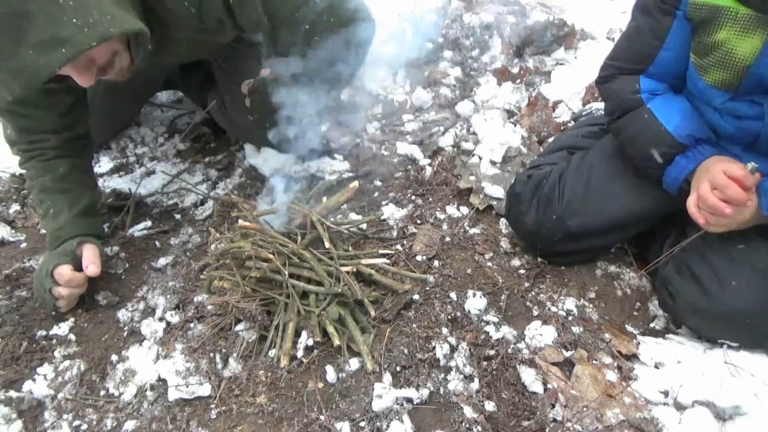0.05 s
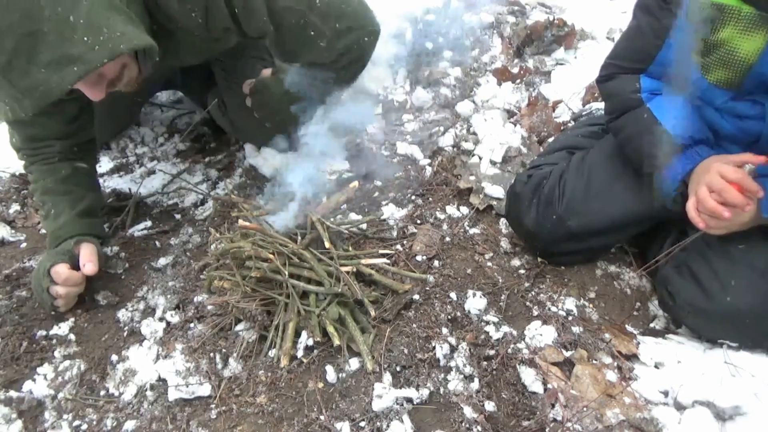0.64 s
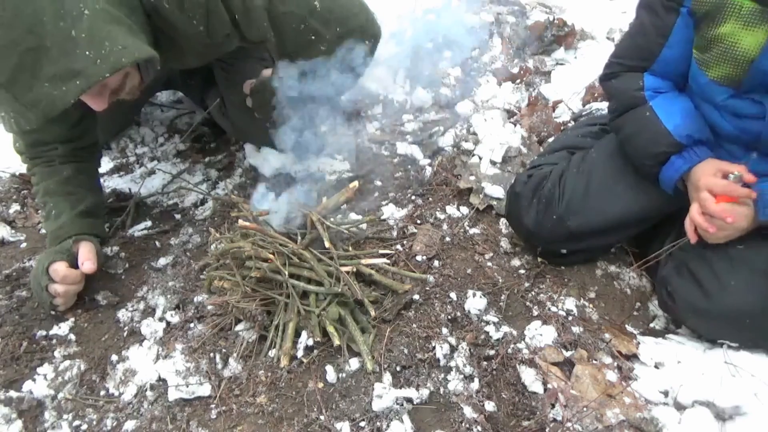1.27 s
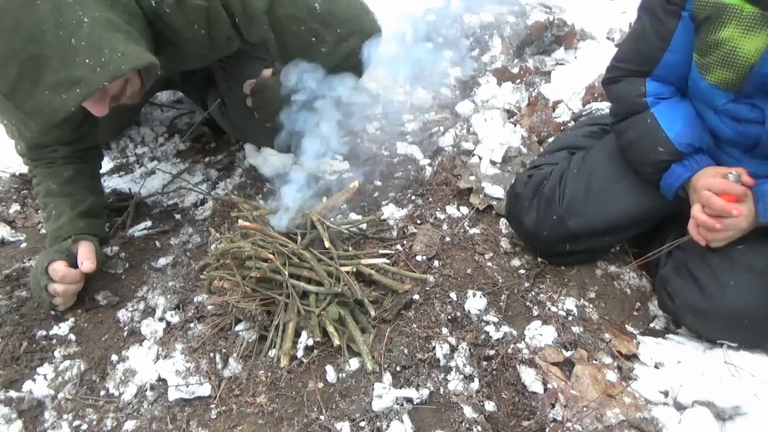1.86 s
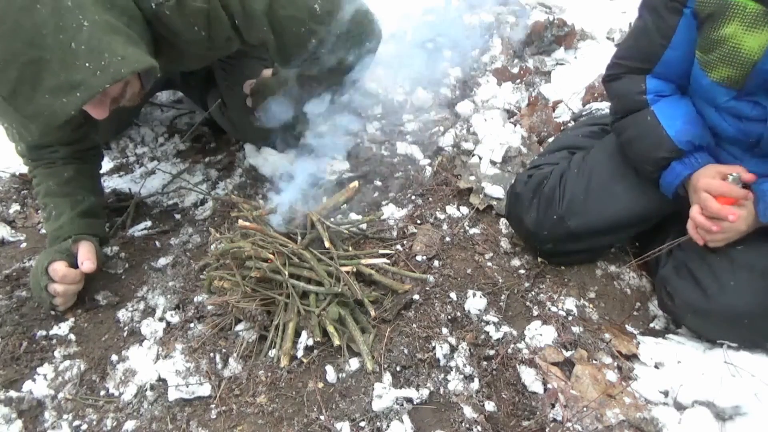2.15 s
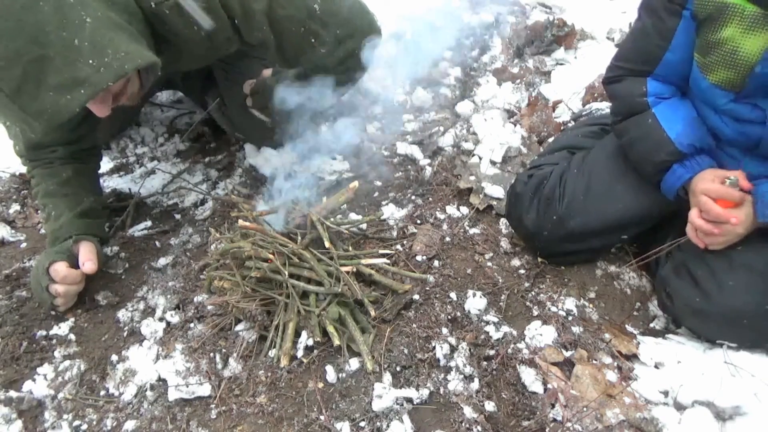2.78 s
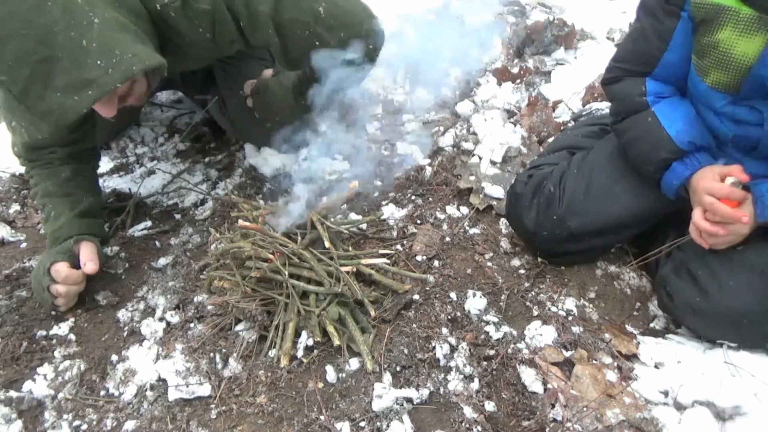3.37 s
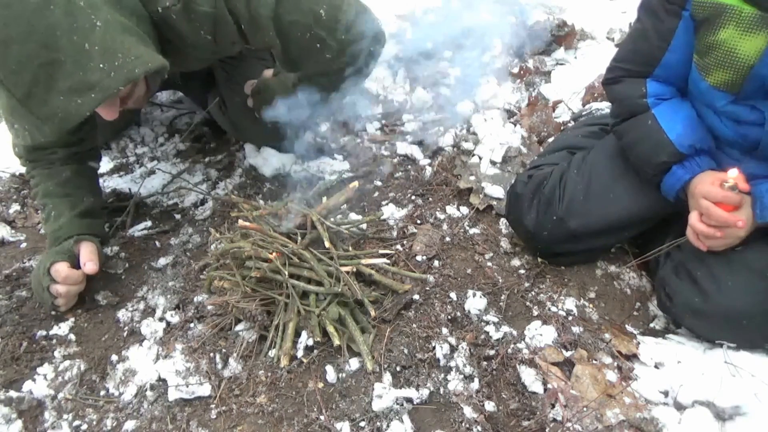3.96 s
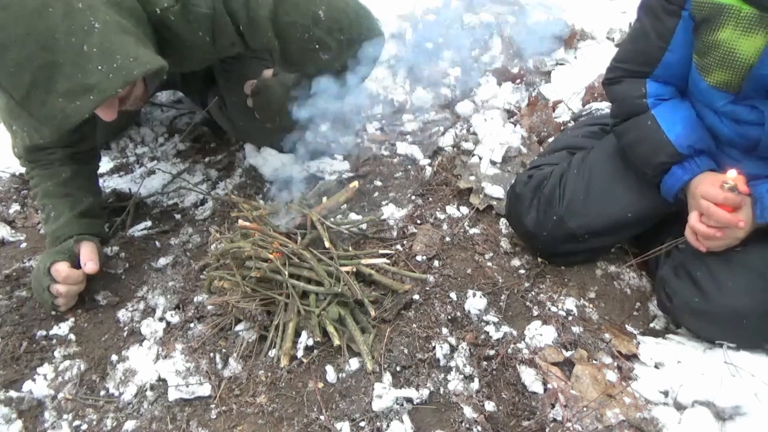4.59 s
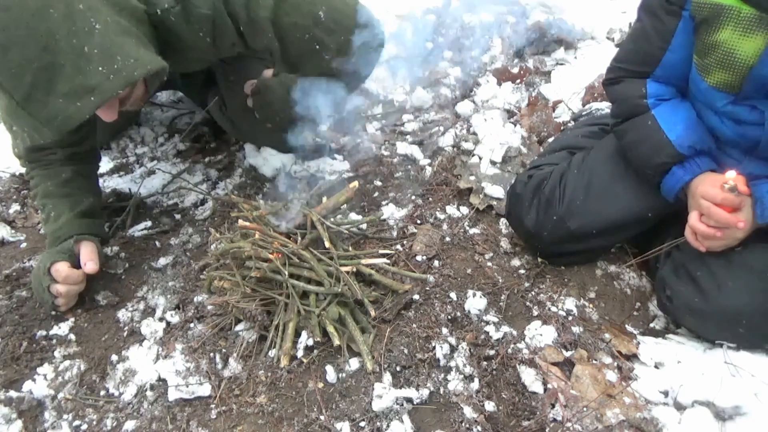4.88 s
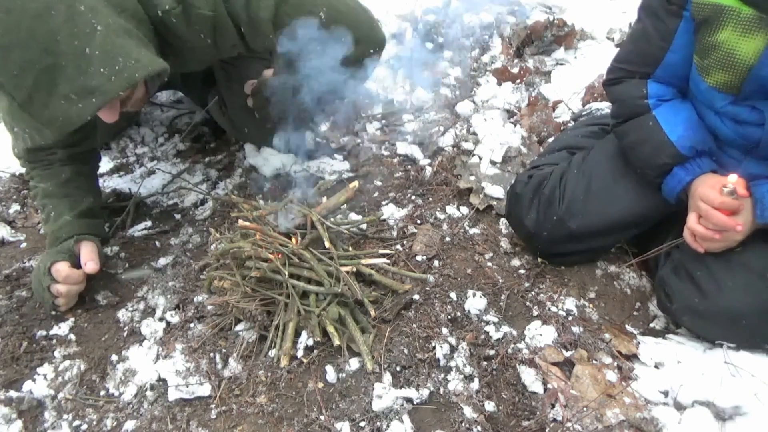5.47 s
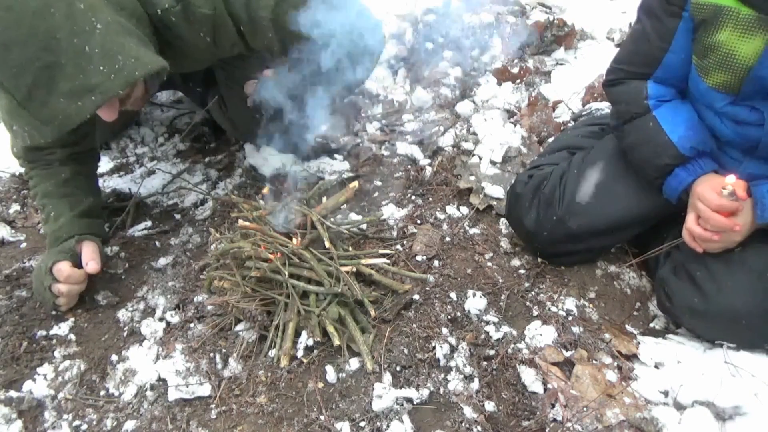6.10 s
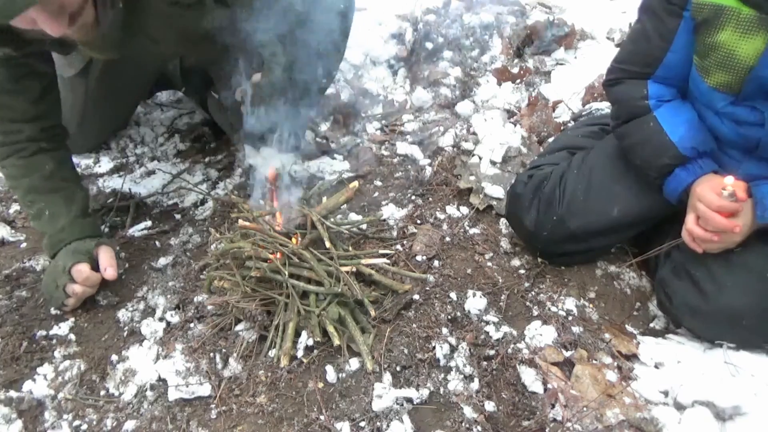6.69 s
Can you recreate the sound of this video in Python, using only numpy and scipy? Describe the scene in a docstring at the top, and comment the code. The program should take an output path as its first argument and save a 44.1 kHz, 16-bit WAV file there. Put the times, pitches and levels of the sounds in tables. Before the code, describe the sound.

A small heap of damp twigs and needles smoulders outdoors, close to the microphone and near the centre. A faint, fine, bright crackle runs throughout, dotted with small ticks and dry pops of sap. Loud, sharp snaps stand out at about 2.0, 2.9, 4.2 and 5.3 seconds, the first and last being the strongest, with milder ones near 4.6 and 5.1 seconds. The crackle thickens around 5.7 seconds, then eases.

Slightly to the right, a thumb turns a lighter's wheel four times, at about 1.2, 1.8, 2.6 and 3.5 seconds. Each is a brief, gritty, slightly metallic scrape, much quieter than the big snaps. A few small dull handling ticks fall mostly in the first second and a half. A lens motor ticks barely audibly at the start and in the last second. Very faint distant traffic and a soft hiss continue underneath until the end, near 6.7 seconds.

```python
"""In snowy woods, a heap of damp twigs and needles smoulders close to a camera. Pockets of sap burst
with sharp pops over a fine crackle. To the right, a thumb turns a lighter's wheel four times, scraping
the flint. The camera's lens motor ticks faintly near the start and the end. Behind it all,
far traffic murmurs and the microphone hisses."""
import sys
import numpy as np
from scipy import signal
from scipy.fft import rfft, irfft, next_fast_len
from scipy.io import wavfile
from scipy.ndimage import uniform_filter1d, map_coordinates

SR = 44100
rng = np.random.default_rng(int(sys.argv[2]) if len(sys.argv) > 2 else 0)


def inscribe(sig):
    """Save sig as 16-bit PCM at rate SR to the path in sys.argv[1].

    A 1-D sig is mono; a 2-D sig holds one channel per row.
    Samples are clipped to [-1, 1] before scaling.
    """
    pcm = np.round(np.clip(np.atleast_2d(sig).T, -1, 1) * 32767)
    wavfile.write(sys.argv[1], SR, pcm.astype(np.int16))


N = 297234

# Levels in the tables are relative: the functions add their own gain.
# the loudest bursts of sap: t/s, level/dB, body/dB (extra strength below the treble)
SAP_POPS = [(0.0862, -33.5, -1), (0.389, -27, -8), (0.9768, -37.5, 18), (1.9621, -5.5, 9.5),
            (2.1095, -39.5, -3), (2.224, -35.5, -8), (2.927, -14.5, 5.5), (3.441, -30, 12),
            (3.5908, -36, -8), (4.146, -36, -7), (4.246, -11, 2.5), (4.2846, -37, -4), (4.4155, -38.5, -11),
            (4.5859, -23.5, 2.5), (4.6174, -33.5, -10), (4.6894, -33.5, 7), (4.9228, -37.5, -10),
            (5.0994, -22, 0.5), (5.2608, -33.5, -10), (5.322, -5, -2), (5.4926, -34, -7), (5.6286, -32, -8),
            (5.633, -27.5, -6), (5.8006, -35.5, -8), (5.9143, -33.5, -6), (6.0928, -33, -3),
            (6.1786, -32, -8), (6.2087, -35.5, -4), (6.6794, -31.5, -5)]
# the tone of a pop: f/Hz, level/dB
POP_TONE = [(80, -18), (450, -23), (900, -40), (1600, -16.5), (2600, -24.5), (4200, -5), (5700, -11.5),
            (7300, -3), (8300, 0.5), (9800, 3.5), (11000, -2), (13000, -10)]
# where a pop gets its body: f/Hz, share of body
BODY_SHARE = [(700, 0.62), (2000, 1), (5500, 0.25), (8000, 0)]
# sticks jolted by strong pops: t/s, level/dB, f/Hz
STICK_KNOCKS = [(2.928, -44.5, 950), (4.2478, -41.5, 600), (5.1012, -46.5, 850), (5.3235, -44, 620)]
# how lively the embers are: t/s, crackles per second
CRACKLE_RATE = [(0, 31), (1.5, 16.6), (5.2, 32), (5.7, 120), (6.74, 29)]
# what makes a crackle brighter than a pop: f/Hz, level/dB
CRACKLE_TILT = [(5000, -2), (8500, -0.5)]
# thumb strokes on the lighter's wheel: t/s, level/dB, hold/s, brightness/dB
THUMB_STROKES = [(1.174, -36.5, .001, -3), (1.847, -35, .021, 3.5), (2.643, -27.5, 0.0039, 11.5),
                 (3.479, -29, 0.0057, -4)]
# the wheel catches on the flint as a stroke ends: t/s, level/dB
FLINT_CATCHES = [(1.189, -39), (1.8737, -25), (1.882, -32), (1.891, -33), (3.4936, -33), (3.4975, -31.5)]
# the tone of the scraped flint: f/Hz, level/dB
RASP_TONE = [(150, -17), (1200, -18), (2000, -8.5), (2750, -1.5), (3500, -1), (4800, -0.5), (6000, -9),
             (7500, 1.5), (8600, 1), (10000, -5.5), (11200, -8), (12500, -70)]
# where a scrape gets its brightness: f/Hz, share of brightness
BRIGHT_SHARE = [(4000, 0.17), (8000, 0.73)]
# the ringing notes of the steel hood and wheel: f/Hz, width/Hz, level/dB
HOOD_NOTES = [(2790, 33, -18), (2840, 230, -0.5), (3760, 32, -3.5), (5000, 69, 4.5), (5120, 51, -6),
              (5570, 45, 2), (7370, 36, -3), (7850, 88, -2)]
# the hand bumps the lighter: t/s, level/dB
HAND_BUMPS = [(2.14, -59), (2.254, -60), (2.642, -55), (3.216, -53)]
# small dull ticks: t/s, level/dB
DULL_TICKS = [(0.349, -40), (0.8459, -44), (0.875, -36.5), (1.3848, -39), (5.5462, -39)]
# the tone of a tick: f/Hz, level/dB
TICK_TONE = [(800, -18), (2000, -7), (2900, -0.5), (5500, -11), (11000, -15.0)]
# when the lens motor runs: start/s, end/s, level/dB
LENS_RUNS = [(0.018, .80, -59.5), (5.5567, 6.74, -60)]
# the tone of far tyres: f/Hz, level/dB
TYRE_TONE = [(150, -16), (330, -11), (480, -4), (640, -4.5), (820, 0), (1130, -3), (1400, -6),
             (1900, -10.5), (2600, -20.5), (5000, -53)]
# far engines: f/Hz, starting level/dB, change/(dB per s)
FAR_ENGINES = [(84, -77.5, 0.73), (152.7, -75.5, -0.38)]
# the tone of the low rumble: f/Hz, level/dB
RUMBLE_TONE = [(15, -30), (30, 3), (48, -0.5), (65, -3), (110, -4), (200, -6), (350, -10), (800, -26)]
# the tone of the microphone's hiss: f/Hz, level/dB
HISS_TONE = [(1200, -28), (2000, -9.5), (2900, -1.5), (4000, -5), (5300, -7.5), (7500, -5.5), (9200, -3.5),
             (10200, -7.5), (11000, -8.5), (11300, -46), (12500, -70)]
# how the hiss rises and falls: t/s, level/dB
HISS_DRIFT = [(0, -67), (1.0, -64), (2.2, -66), (4.2, -68), (5.5, -68), (6.74, -66)]
# how alike the background is left and right: f/Hz, likeness (1 or more is nearly the same)
STEREO_LIKENESS = [(60, 1.2), (120, 1), (220, 0.8), (430, 0.8), (840, 0.81), (1620, 0.43), (3130, 0.42),
                   (6050, 0.67), (11700, 0.88)]
# how the background leans to one side: f/Hz, left minus right/dB
STEREO_LEAN = [(60, 0.5), (130, 0.0), (270, 0), (570, 1), (1220, 4), (2590, 1), (5500, -0.5), (11700, 1)]
# the camera's steep loss of treble: f/Hz, level/dB
TREBLE_EDGE = [(10950, 0), (11300, -14), (12300, -31), (14000, -44)]

HEAP_PAN_DB, LIGHTER_PAN_DB = 1.4, -4.5  # above zero is left, below zero is right


def sap_pops(gain_db=6.5, heap_db=-16, ground_db=-24, twig_db=-26, delay_s=0.00067):
    """A pocket of sap bursts and rings its twig; the heap and the ground scatter the crack."""
    out = np.zeros((2, N))
    for s, db, body_db in SAP_POPS:
        crack = impulse(lambda hz: along(POP_TONE, hz) + body_db * along(BODY_SHARE, hz))
        burst = ragged_burst()
        sides = []
        for _ in range(2):  # left and right get their own echoes
            heap = amp(heap_db) * delayed(echoes(t60=0.05))
            ground = amp(ground_db) * delayed(echoes(t60=0.057))
            sides.append(burst + heap + ground)
        pop = signal.fftconvolve(sides, crack[None], axes=1)
        add(out, s + delay_s, amp(db + gain_db) * pop / np.linalg.norm(pop[0]))
        add(out, s + delay_s, amp(db + twig_db + body_db) * delayed(twig_ring()))
    return panned(out, HEAP_PAN_DB)


def ragged_burst(t60=0.0035, ripple=0.83):
    """The short, rough puff of a pop; less ripple makes its frequencies more even."""
    spectrum = rfft(echoes(t60))
    burst = irfft(spectrum / (np.abs(spectrum) + 1e-9) ** (1 - ripple))
    return np.roll(burst, SR // 1000) / np.linalg.norm(burst)


def twig_ring(pitch_hz=4100, spread=.25, t60=.015, count=6):
    """A twig rings briefly with a few notes of random pitch."""
    t = np.arange(2048) / SR
    hz = pitch_hz * np.exp(spread * np.clip(rng.standard_normal((count, 1)), -2, 2))
    return np.sin(2 * np.pi * hz * t).mean(axis=0) * amp(-60 * t / t60)


def stick_knocks(t60=0.014):
    """A stick jolted by a pop gives a short, hollow knock."""
    out, t = np.zeros((2, N)), np.arange(SR // 20) / SR
    for s, db, hz in STICK_KNOCKS:
        add(out, s, amp(db - 60 * t / t60) * np.sin(2 * np.pi * hz * t))
    return panned(out, HEAP_PAN_DB)


def needle_crackle(level_db=-52, spread_db=3.2, max_boost_db=8):
    """Many small, bright bursts in the needles, at random moments and of random size."""
    bursts = rng.random(N) < over_time(CRACKLE_RATE) / SR
    sizes = amp(np.minimum(spread_db * rng.exponential(size=N), max_boost_db))
    crack = impulse(lambda hz: along(POP_TONE, hz) + along(CRACKLE_TILT, hz))
    return amp(level_db) * signal.fftconvolve(bursts * sizes, crack / np.abs(crack).max())[:N]


def lighter(ground_db=-15):
    """The wheel scrapes the flint and rings the steel hood; the ground adds a short echo."""
    out = np.zeros((2, N))
    for s, db, hold_s, bright_db in THUMB_STROKES:  # a slower stroke also swells more slowly
        add_scrape(out, s, db, bright_db, rise_s=0.0031 + 0.27 * hold_s, hold_s=hold_s)
    for s, db, _, _ in THUMB_STROKES:  # the thumb rubs the wheel before it bites
        add_scrape(out, s, db - 17.5, bright_db=-8, rise_s=0.016)
    for s, db in FLINT_CATCHES:  # a catch is short and a little dull
        add_scrape(out, s, db, bright_db=-3, rise_s=0.0004, fall_s=0.0017)
    out = filtered(out, steel_hood)
    ground = np.array([echoes(t60=0.097) for _ in range(2)])
    return out + amp(ground_db) * signal.fftconvolve(out, ground, axes=1)[:, :N]


def add_scrape(out, s, db, bright_db, rise_s, hold_s=0, fall_s=0.0041, gain_db=-2.5, grit_db=2):
    """Mix in one scrape of the wheel: noise, made gritty by its teeth, that swells and dies."""
    t = np.arange(-SR // 12, SR // 12) / SR
    pressure = np.exp(np.minimum(np.minimum(t / rise_s, (hold_s - t) / fall_s), 0))
    teeth = amp(grit_db * unit(uniform_filter1d(rng.standard_normal(len(t)), size=40)))
    tone = lambda hz: amp(along(RASP_TONE, hz) + bright_db * along(BRIGHT_SHARE, hz))
    rasp = unit(filtered(teeth * rng.standard_normal(len(t)), tone))
    add(out, s + t[0], amp(db + gain_db) * panned(pressure * rasp, LIGHTER_PAN_DB))


def steel_hood(hz):
    """The hood lets the scrape through and boosts it near its own ringing notes."""
    return 1 + sum(amp(db) * 1j * hz * width / (note ** 2 - hz ** 2 + 1j * hz * width)
                   for note, width, db in HOOD_NOTES)


def hand_bumps(pitch_hz=255, swell_s=.005, gain_db=-3):
    """Soft, low bumps as the hand shifts its grip."""
    out, t = np.zeros((2, N)), np.arange(SR // 10) / SR
    bump = np.sin(2 * np.pi * pitch_hz * t) * t / swell_s * np.exp(1 - t / swell_s)
    for s, db in HAND_BUMPS:
        add(out, s, amp(db + gain_db) * bump)
    return out


def dull_ticks(gain_db=-4, delay_s=0.00087):
    """Small dull ticks, like plastic shifting in a hand."""
    out = np.zeros((2, N))
    shell = impulse(lambda hz: along(TICK_TONE, hz))
    for s, db in DULL_TICKS:
        tick = signal.fftconvolve(echoes(t60=0.017), shell)
        add(out, s + delay_s, amp(db + gain_db) * tick / np.abs(tick).max())
    return out


def lens_motor(whine_hz=3220, octave_db=-6, step_s=0.0026, steps_per_s=29.97, gain_db=-1):
    """The motor moves in short whining steps, each with a slightly different level and pitch."""
    out, t = np.zeros((2, N)), np.arange(-SR // 100, SR // 100) / SR
    swell = np.exp(-(t / step_s) ** 2)
    for start, end, db in LENS_RUNS:
        for s in np.arange(start, end, 1 / steps_per_s):
            size, detune = rng.standard_normal(2)
            phase = 2 * np.pi * whine_hz * (1 + 0.011 * detune) * t
            whine = np.sin(phase) + amp(octave_db) * np.sin(2 * phase)
            add(out, s + t[0], amp(db + gain_db + 1.6 * size) * whine * swell)
    return out


def far_traffic(tyre_db=-57.5, fade_db_per_s=0.1, drift_db=0.8, swell_db=2, rumble_db=-64):
    """Tyres slowly move away while engines swell and waver over a low rumble."""
    t = np.arange(N) / SR
    tyres = amp(tyre_db - fade_db_per_s * t + drift_db * wobble(6)) * wide_noise(TYRE_TONE)
    engines = np.zeros(N)
    for hz, db, db_per_s in FAR_ENGINES:
        loudness = amp(db + db_per_s * t + swell_db * wobble(3.17))
        engines += loudness * unit(np.sin(2 * np.pi * hz * t + wobble(4)))
    return tyres + engines + amp(rumble_db) * wide_noise(RUMBLE_TONE)


def microphone_hiss(gain_db=1):
    """The microphone's own faint hiss drifts slowly in level."""
    return amp(over_time(HISS_DRIFT) + gain_db) * wide_noise(HISS_TONE)


def wide_noise(tone):
    """Noise from all around: a middle part both sides share, and a side part that sets them apart."""
    def middle_and_side(hz):
        angle = np.arccos(np.clip(along(STEREO_LIKENESS, hz), 0, .99)) / 2
        return amp(along(tone, hz)) * [np.cos(angle), np.sin(angle)]
    middle, side = filtered(rng.standard_normal((2, N)), middle_and_side)
    lean = lambda hz: amp(along(STEREO_LEAN, hz) * np.array([[.5], [-.5]]))
    return unit(filtered(np.array([middle + side, middle - side]), lean))


def echoes(t60, size=2048):
    """A cloud of tiny echoes that fades at a pace of 60 dB in t60 seconds."""
    cloud = rng.standard_normal(size) * amp(-60 * np.arange(size) / SR / t60)
    return cloud / np.linalg.norm(cloud)


def impulse(tone_db, size=2048):
    """A click with the given tone, its energy packed at the start."""
    cepstrum = irfft(np.log(amp(tone_db(np.fft.rfftfreq(size, 1 / SR)))))
    cepstrum[1:size // 2] *= 2  # fold it so that nothing sounds before the click
    cepstrum[size // 2 + 1:] = 0
    return irfft(np.exp(rfft(cepstrum)))


def filtered(x, response):
    """Turn each frequency of x up or down by response(hz)."""
    n = x.shape[-1]
    padded = next_fast_len(n + n // 4)
    return irfft(rfft(x, padded) * response(np.fft.rfftfreq(padded, 1 / SR)), padded)[..., :n]


def amp(db):
    """Turn decibels into a gain."""
    return 10 ** (np.asarray(db) / 20)


def unit(x):
    """Scale x to an average power of 1."""
    return x / np.sqrt(np.mean(x ** 2) + 1e-20)


def along(points, hz):
    """Read a table of (frequency, value) at hz, with octaves evenly spaced."""
    freqs, values = np.transpose(points)
    return np.interp(np.log(hz + 1), np.log(freqs + 1), values)


def over_time(points):
    """Read a table of (time, value) at every sample."""
    return np.interp(np.arange(N) / SR, *np.transpose(points))


def wobble(rate):
    """A smooth curve through rate random points a second."""
    points = rng.standard_normal(int(N * rate / SR) + 4)
    return map_coordinates(points, [np.arange(N) * rate / SR])


def delayed(x):
    """Delay x by the millisecond in which a burst swells."""
    return np.pad(x, (SR // 1000, 0))[:len(x)]


def panned(x, pan_db):
    """Place x to the left or right by making one side louder."""
    return x * amp([[pan_db / 2], [-pan_db / 2]])


def add(out, s, sound):
    """Mix a sound into out at s seconds."""
    start = max(round(s * SR), 0)
    stretch = out[:, start:start + sound.shape[-1]]
    stretch += sound[..., :stretch.shape[-1]]


def scene():
    """The fire, the lighter, the camera and the far traffic together."""
    fire = sap_pops() + stick_knocks() + needle_crackle()
    handling = lighter() + hand_bumps() + dull_ticks()
    return fire + handling + lens_motor() + far_traffic() + microphone_hiss()


def record(dry):
    """The camera loses the highest treble and keeps nothing above 16500 Hz."""
    return filtered(dry, lambda hz: amp(along(TREBLE_EDGE, hz)) * (hz < 16500))


dry = scene()
out = record(dry)
inscribe(out)
```